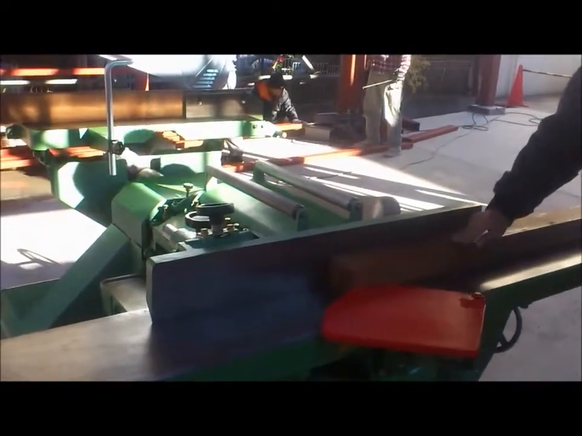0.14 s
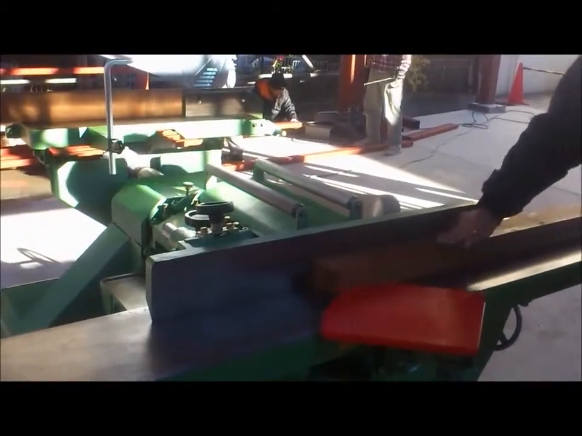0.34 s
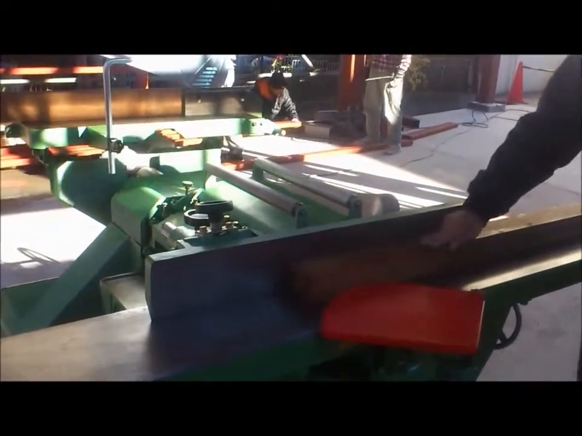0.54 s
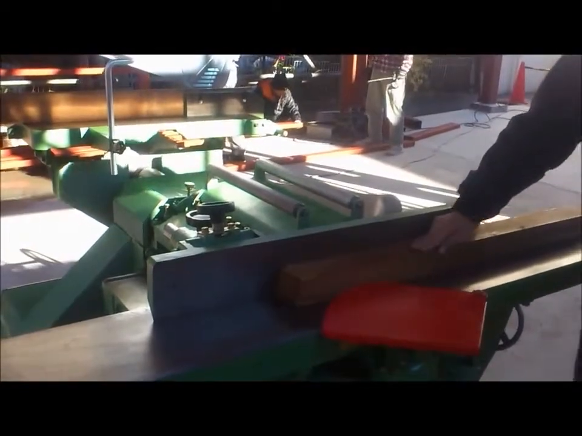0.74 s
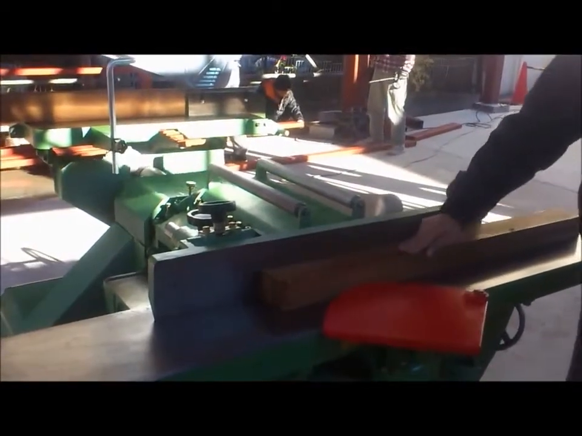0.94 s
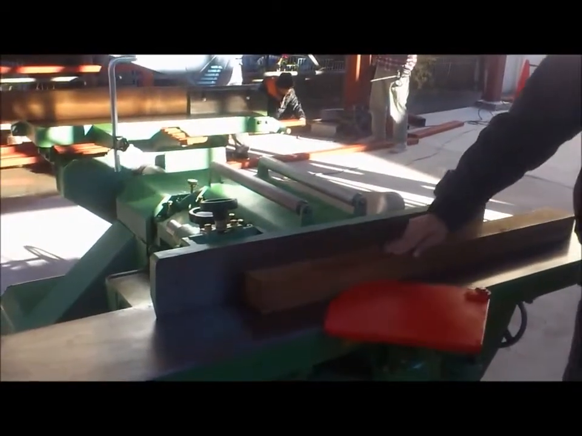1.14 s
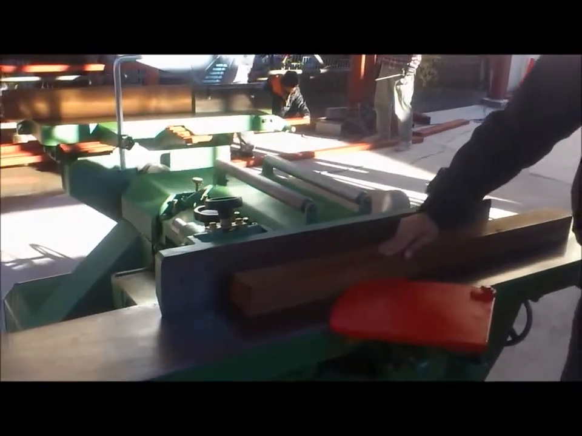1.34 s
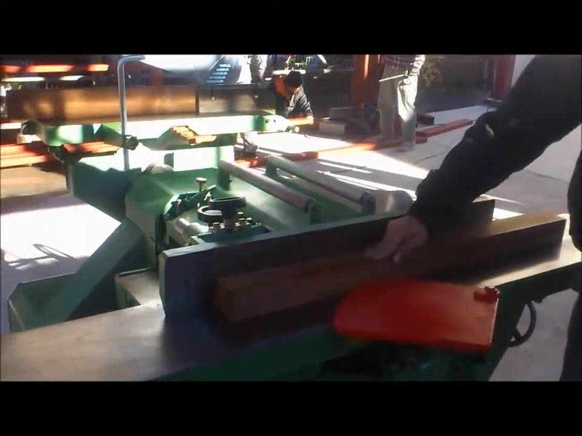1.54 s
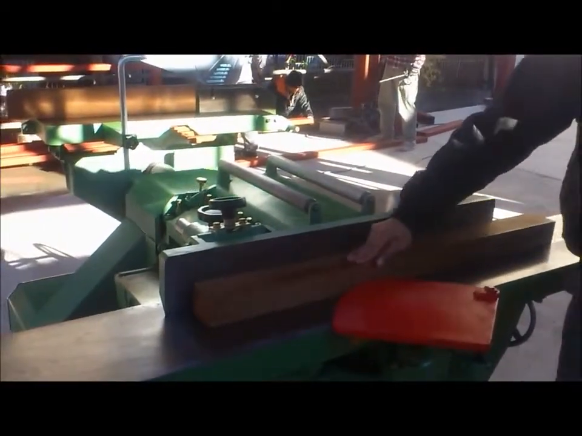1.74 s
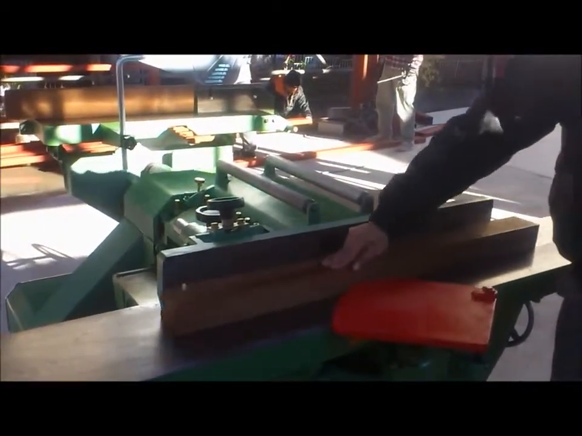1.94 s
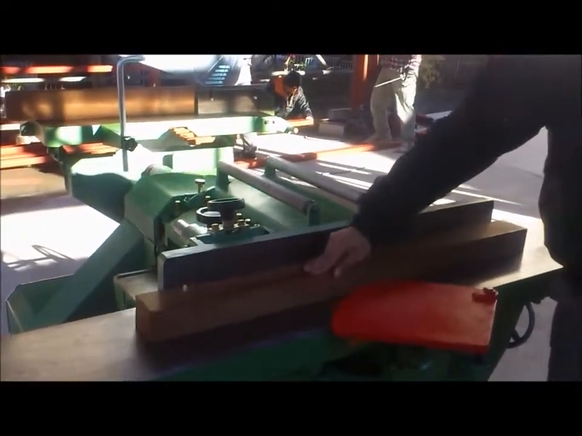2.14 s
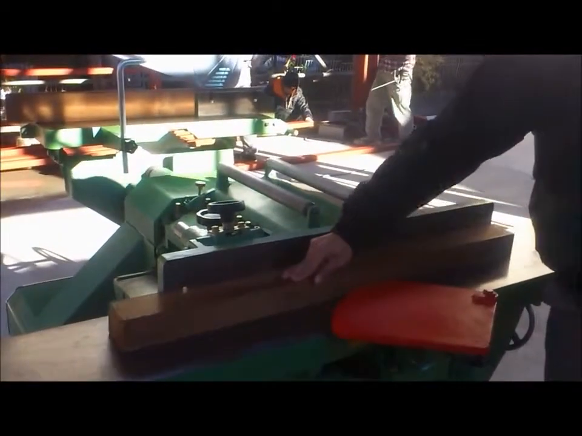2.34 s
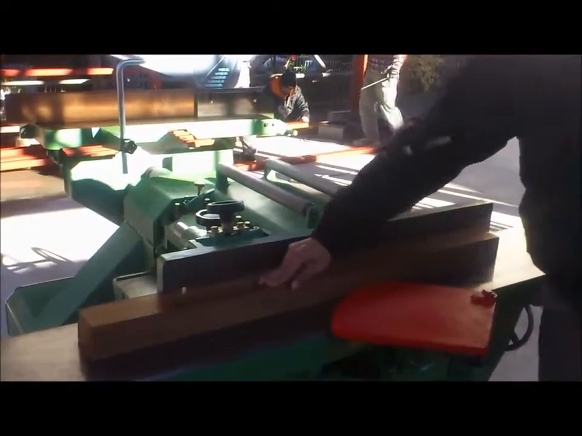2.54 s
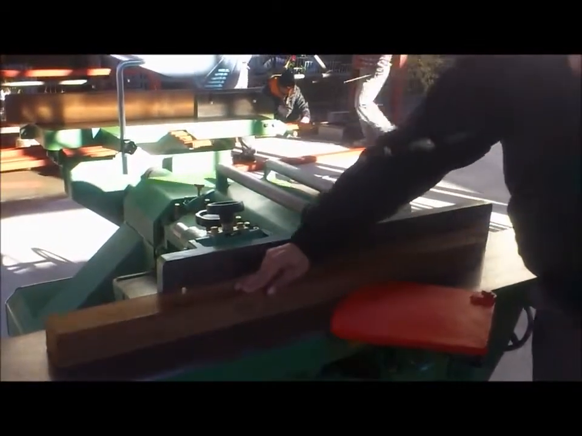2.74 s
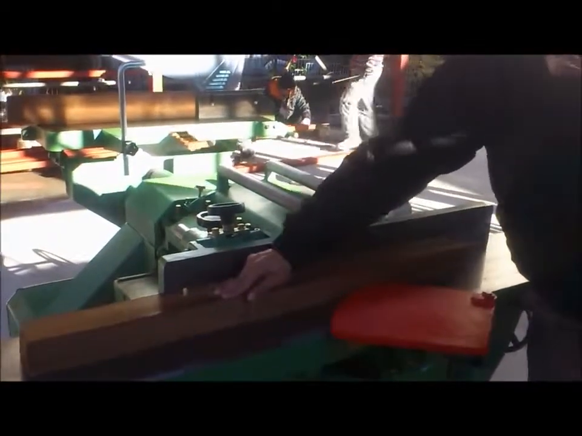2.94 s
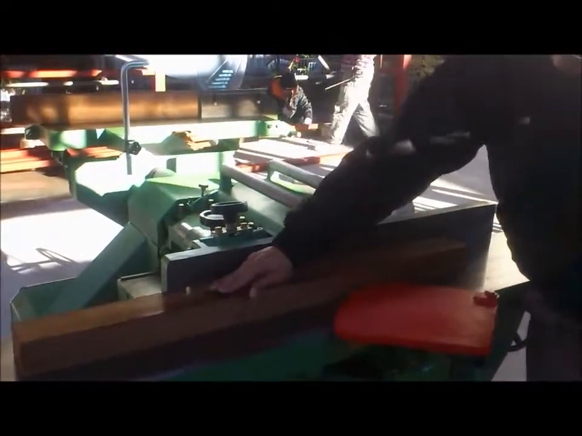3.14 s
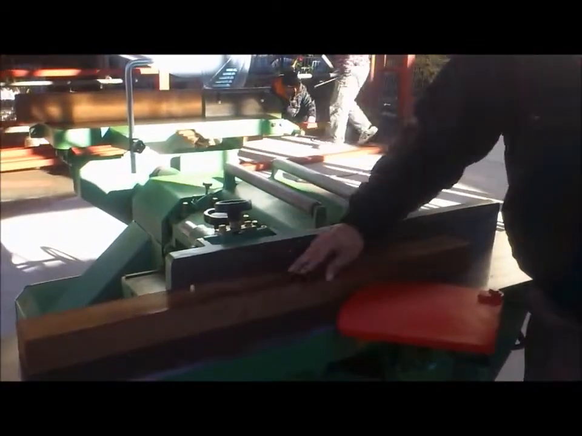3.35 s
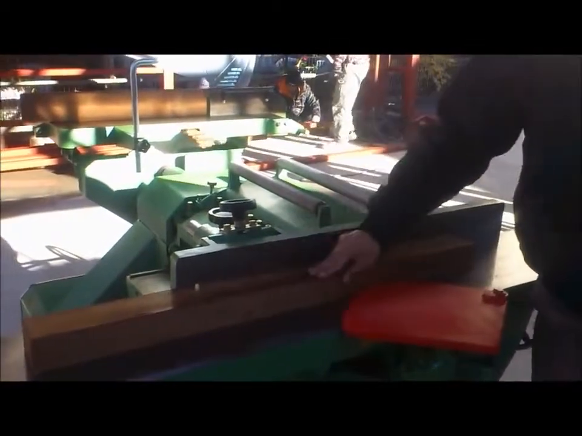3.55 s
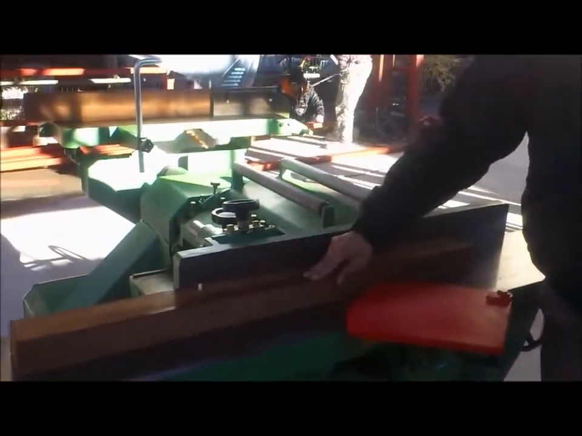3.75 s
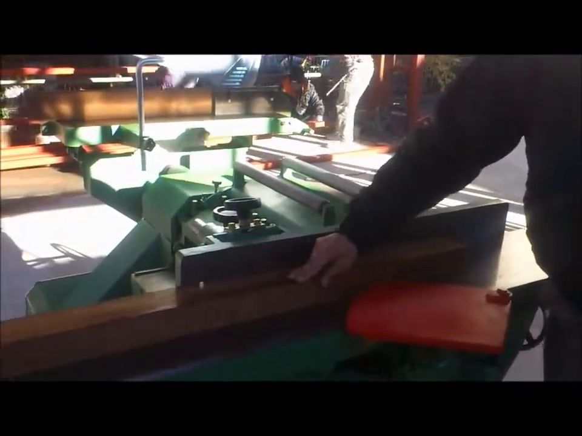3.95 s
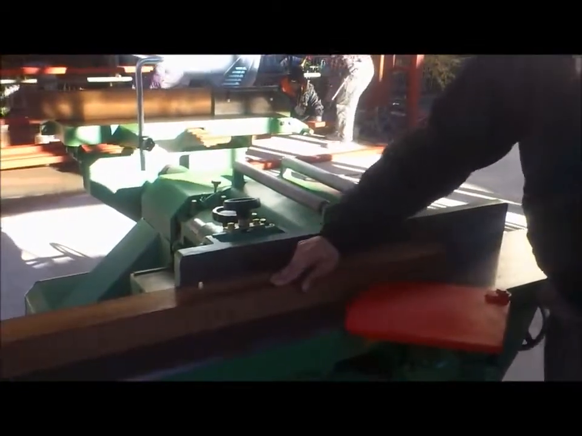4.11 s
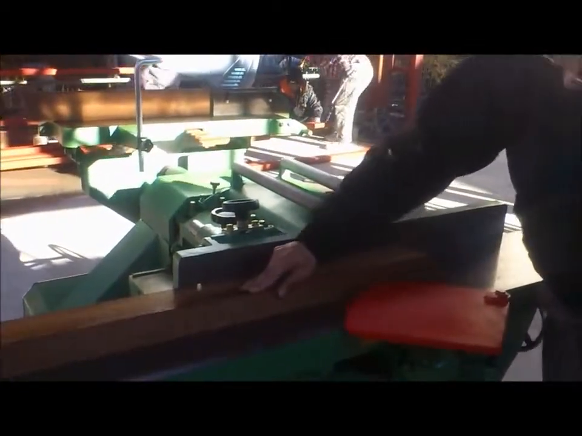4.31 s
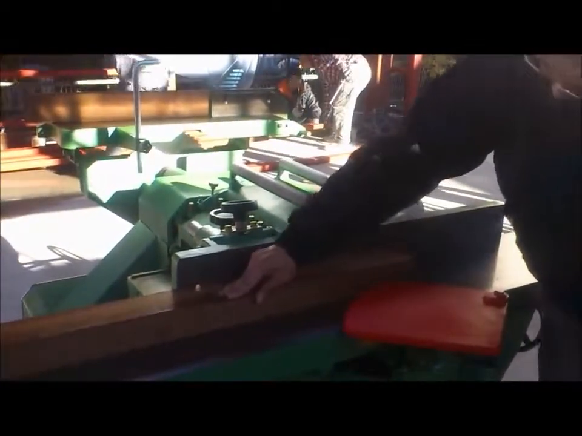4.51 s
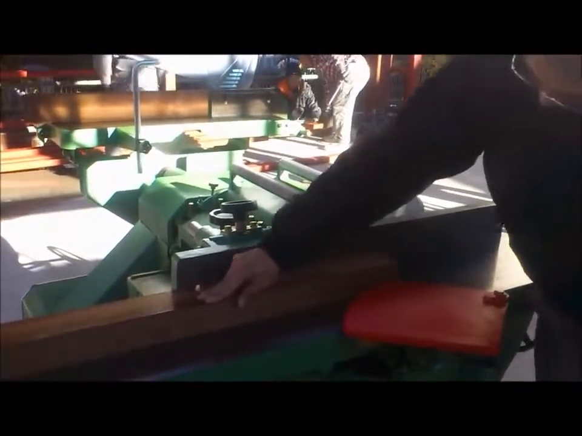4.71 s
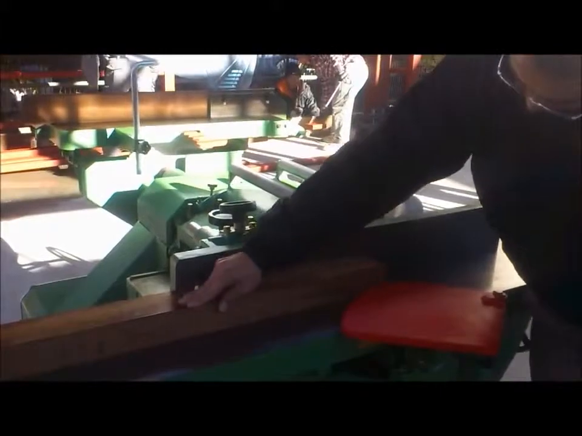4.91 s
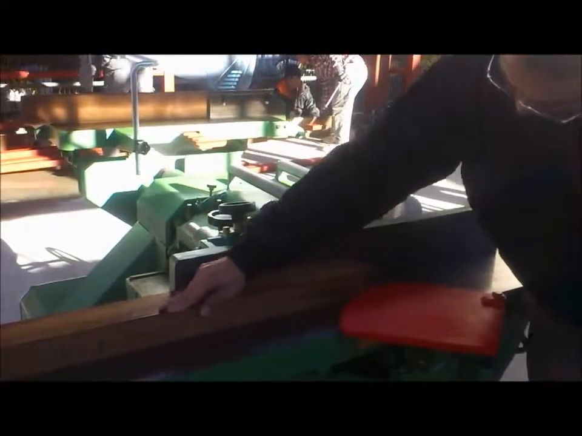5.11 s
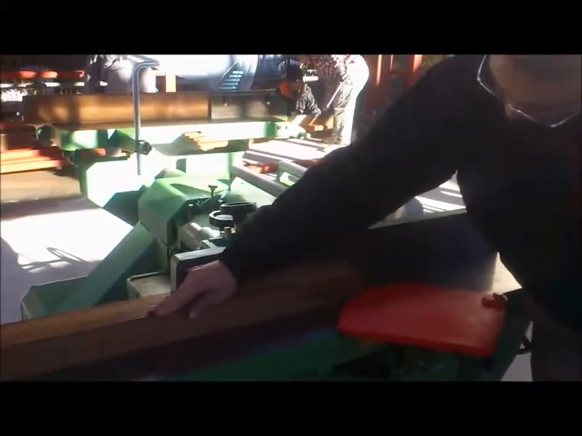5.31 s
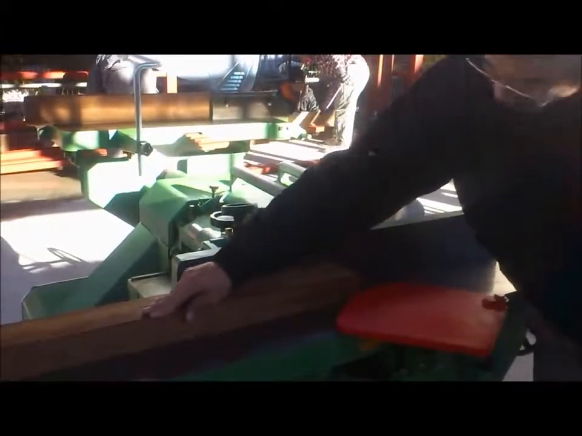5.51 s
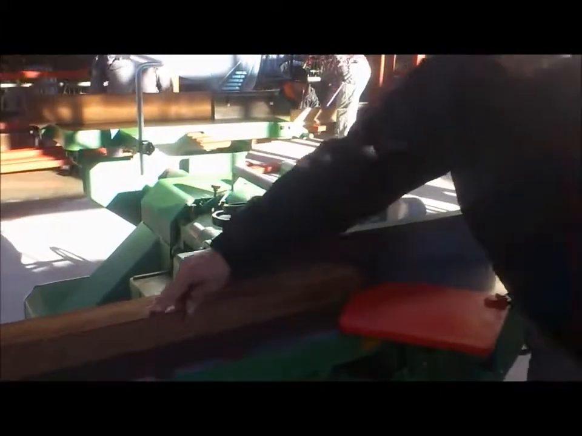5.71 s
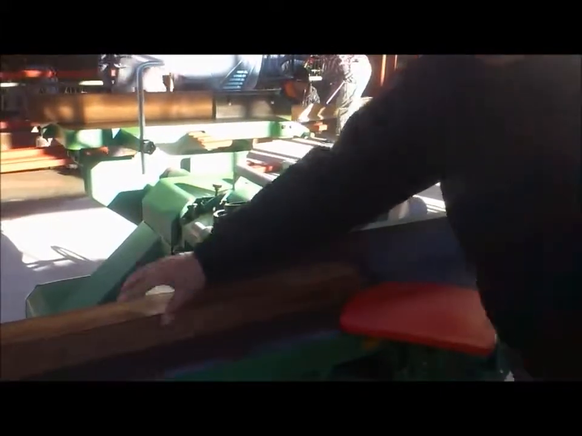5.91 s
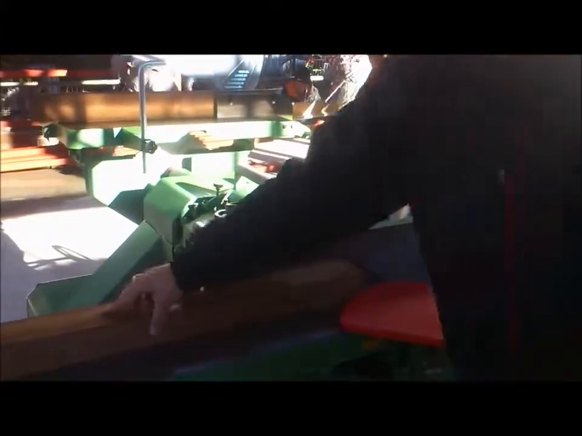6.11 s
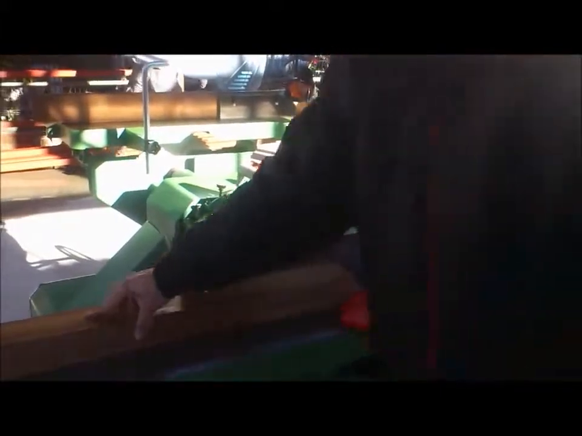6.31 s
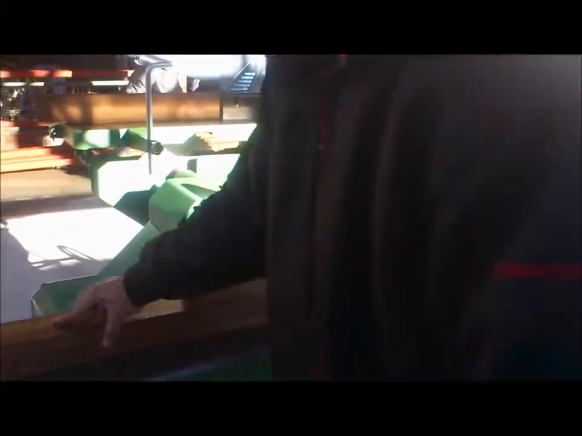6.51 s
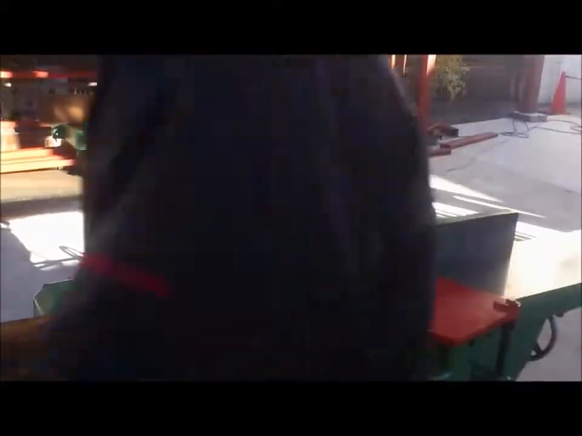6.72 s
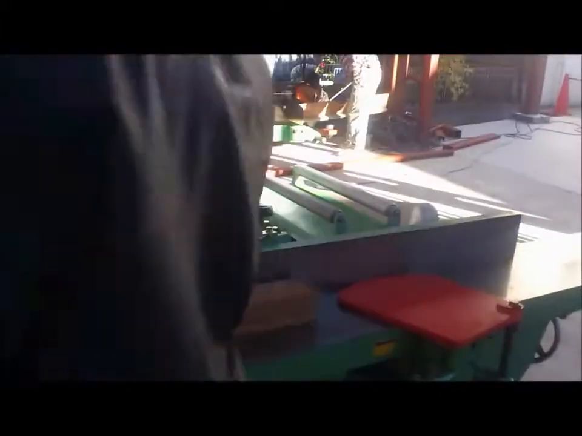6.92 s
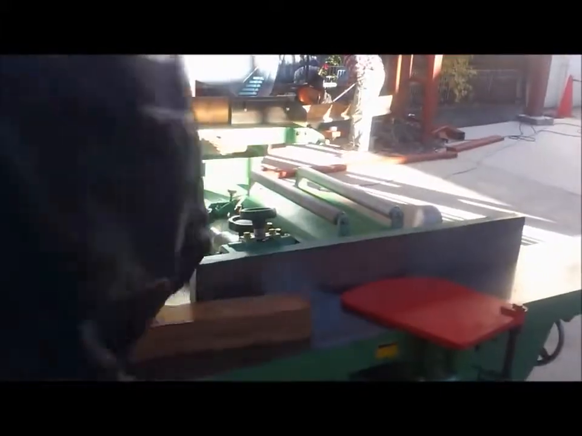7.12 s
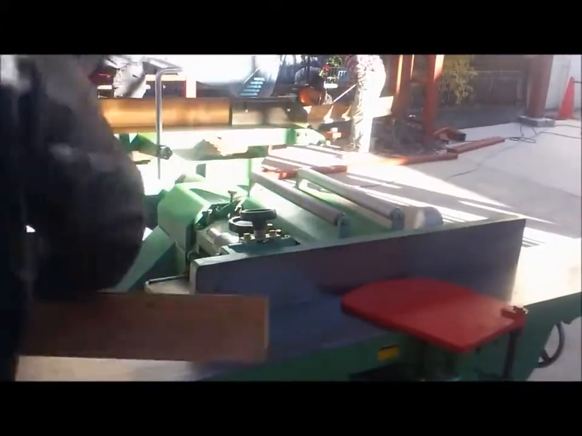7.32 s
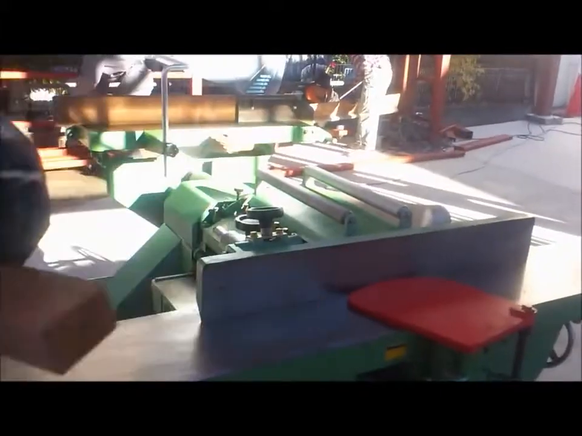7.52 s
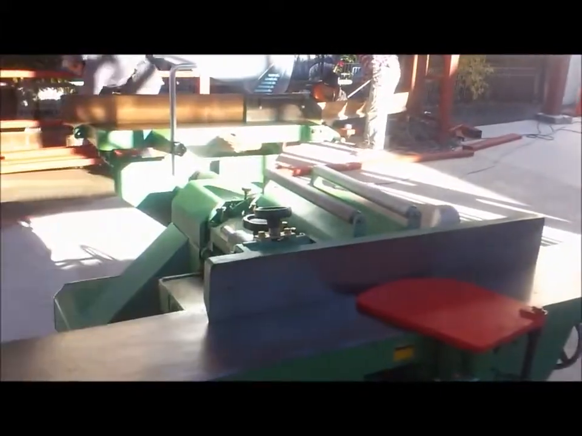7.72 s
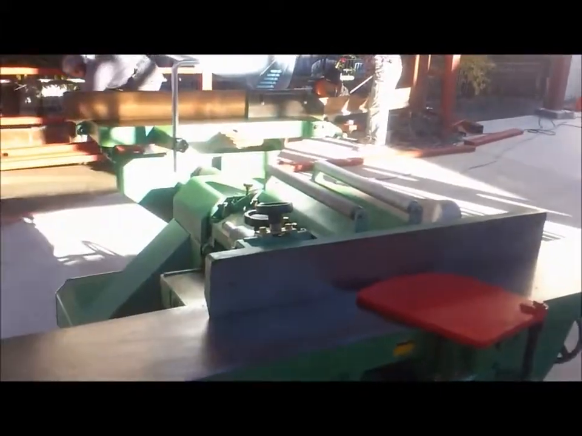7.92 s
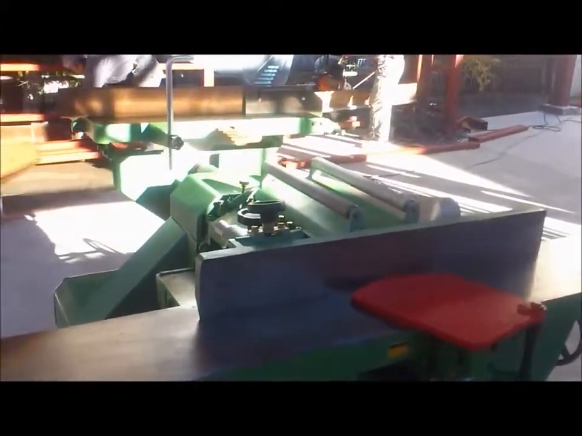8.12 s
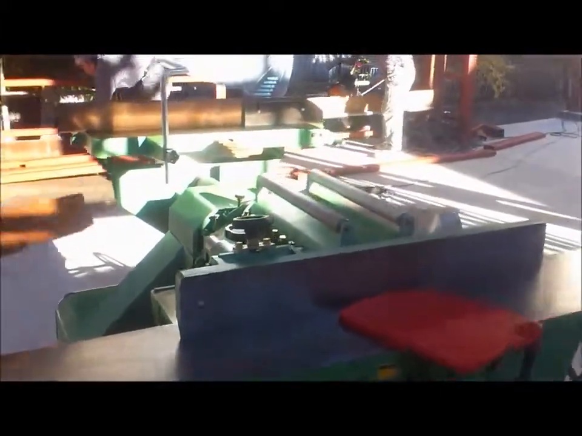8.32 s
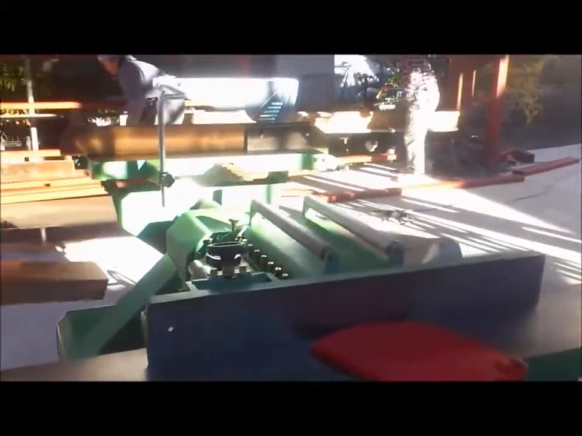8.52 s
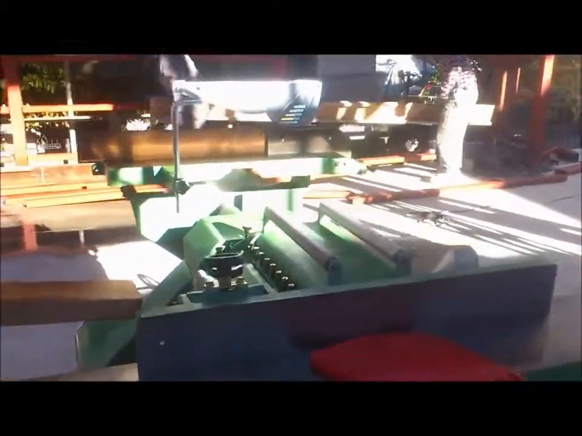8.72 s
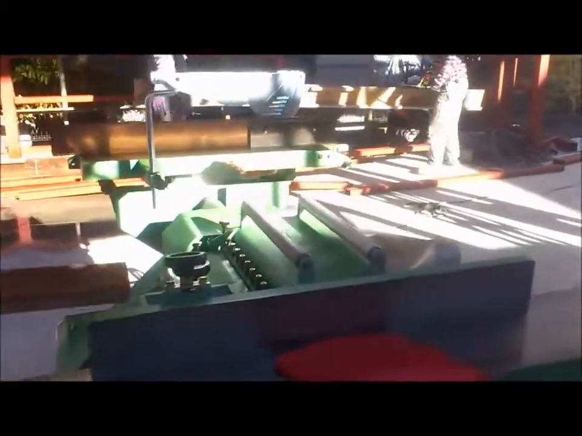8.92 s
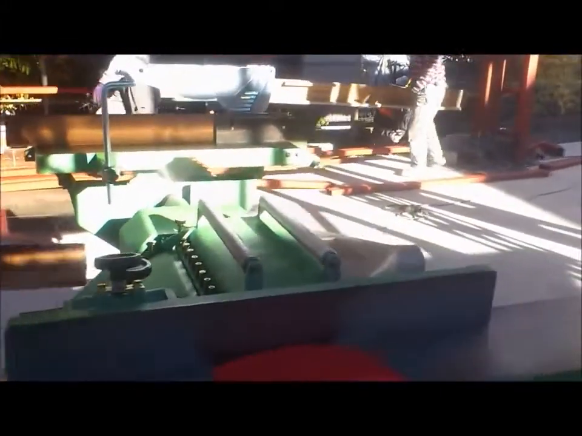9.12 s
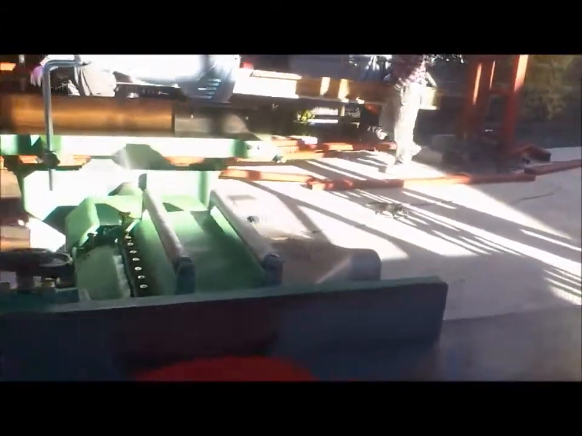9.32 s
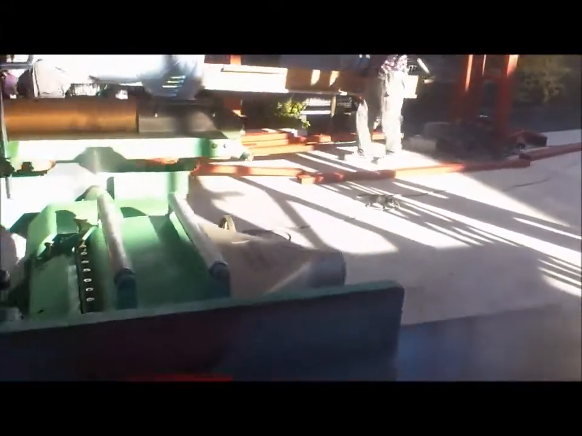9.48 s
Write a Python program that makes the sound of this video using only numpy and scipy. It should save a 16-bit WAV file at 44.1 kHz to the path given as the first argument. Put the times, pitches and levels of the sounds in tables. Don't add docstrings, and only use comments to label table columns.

```python
import sys
import numpy as np
from scipy import signal
from scipy.io import wavfile
from scipy.ndimage import uniform_filter1d, map_coordinates

SR = 44100
rng = np.random.default_rng(int(sys.argv[2]) if len(sys.argv) > 2 else 0)


def master(y):
    cut = np.clip(np.atleast_2d(y).T, -1, 1)
    pcm = np.round(cut * 32767)
    wavfile.write(sys.argv[1], SR, pcm.astype(np.int16))


def voltage_ratio(decibels):
    exponent = np.asarray(decibels, float) / 20
    return 10 ** exponent


N = 421143
TIME_S = np.arange(N) / SR

# f/Hz, density/dB per Hz
WASH_SPECTRUM = [(12, -56), (30, -26), (74, -16.5), (270, -4), (337, -13.5), (388, -7), (434, -17),
                 (513, -6), (825, -11.5), (1400, -12), (1810, -13.5), (2300, -14.5), (2910, -13),
                 (3300, -18), (3840, -19.5), (6500, -23), (9950, -23), (13400, -30.5), (16000, -31.5)]
# t/s, level/dB, treble/dB
WASH_LEVEL = [(0, -34, 2.5), (3.3, -37, 1), (5.1, -37.5, -1), (5.9, -38.5, -1.5), (6.05, -34.5, -1.5),
              (6.2, -38.5, -1), (6.75, -40.5, -2.5), (7, -37, -3), (8, -38, -0.5), (8.6, -37.5, 0.5),
              (9.55, -36.5, 0.6)]
# f/Hz, likeness/1
WASH_LIKENESS = [(30, 0.6), (100, 0.75), (300, 1), (1000, 0.59), (2500, 0.39), (6000, 0.22), (15000, 0.25)]
# f/Hz, level/dB
WASH_LEAN = [(30, 6), (150, -1), (1000, -1), (4000, 3), (6000, 5), (7500, 14), (9000, 20), (11500, 21),
             (13000, 13), (14500, 13), (15700, 6)]
# f/Hz, width/Hz, level/dB, right re left/dB, change once the mic has turned/dB
HUM_BANDS = [(195, 20, -49.5, 3, 2.5), (288, 0.94, -45.5, 4.5, -0.5), (372.5, 10, -50.5, -15, 5),
             (251, 81, -47, -2, 6), (493.2, 79, -45, -7.5, 3), (5183, 6, -64.5, -1, -8),
             (4350, 150, -65, -1, 0), (170, 5, -59, -2, 0), (8940, 750, -52.5, -27, 3),
             (10180, 800, -50, -36, -2), (13000, 300, -57, -23, 0)]
# t/s, level/dB
JOLTS = [(1.28, -59), (2.9, -52), (4.23, -51), (4.95, -51), (7.29, -47), (7.53, -53), (8.01, -52),
         (9.23, -54), (9.39, -53)]
# f/Hz, density/dB per Hz
SCRAPE_SPECTRUM = [(900, -24), (1500, 4), (2600, 0), (3200, 4), (4500, 3), (6500, 0.5), (9300, 6),
                   (12000, -2), (15500, -12)]
# t/s, level/dB, rise/s, fall/s, left minus right/dB
SCRAPES = [
    (5.97, -47, 0.014, 0.065, 19),
    (6.05, -42.5, 0.027, 0.067, 22),
    (6.634, -34, 0.00089, 0.015, 20),
    (6.671, -35, 0.027, 0.057, 16),
    (7.385, -47, .003, 0.047, 20),
    (8.07, -49, .003, 0.043, 25),
]
# t/s, level/dB, f/Hz, t60/s
TICKS = [
    (6.635, -16, 9400, .012),
    (6.635, -32, 1900, .02),
    (6.664, -24, 4200, .012),
    (6.673, -24, 4100, .015),
]
# f/Hz, level/dB, t60/s
GUARD_MODES = [(703, 19, 0.072), (820, 28, 0.03), (1060, 8, 0.05), (1360, 26, 0.11), (1403, 12, 0.32),
               (1980, 3, 0.07), (2375, 19, 0.061), (2650, 20, 0.1), (2890, 6, 0.04), (3500, 8, .07),
               (3760, 5, 0.078), (4560, 3, 0.089), (5100, 6, 0.05), (7100, 7, 0.066)]
# t after knock/s, level/dB
GUARD_BOUNCES = [
    (0, 0),
    (.0085, -7),
    (.026, -16),
    (.043, -20),
]
# t/s, f/Hz
KNIFE_RATE = [(0, 128.43), (.6, 128.27), (1.4, 128.19), (2.2, 128.15), (3.1, 128.18), (3.65, 128.37),
              (4.2, 128.24), (4.7, 128.2), (5.05, 128.25), (5.4, 128.36), (6.2, 128.43), (6.8, 128.39),
              (7.4, 128.45), (8.6, 128.53), (9.55, 128.56)]
# multiple/1, level/dB
COVERED_LINES = [(1, -26.5), (2, -25.5), (3, -7), (4, -1.5), (5, -13.5), (6, -33), (7, -3), (8, -9),
                 (9, -20.5), (10, -36.5), (11, -53), (12, -26), (13, -2.5), (14, -0.5), (15, -66),
                 (16, -21), (17, -10), (18, -9.5), (19, -10), (20, -21), (21, -9), (22, 27), (23, -1),
                 (24, 0.5)]
LIFTED_LINES = [(1, -12), (2, 1.5), (3, -6.5), (4, -5.5), (5, -9.5), (6, -30), (7, -26.5), (8, -12),
                (9, -7), (10, -17.5), (11, -3), (12, -5.5), (13, -14), (14, -27), (15, -2), (16, -2.5),
                (17, -14.5), (18, -10), (19, -23), (20, -13.5), (21, -39), (22, -31), (23, -34),
                (24, -12.5)]
OPEN_LINES = [(1, -11), (2, -10), (3, -7.5), (4, -6), (5, -10), (6, -0.5), (7, 3.5), (8, 4.5), (9, -12.5),
              (10, 4.5), (11, -6.5), (12, -13), (13, -8.5), (14, -30), (15, -4), (16, 3), (17, 3.5),
              (18, -4), (19, -32), (20, -42), (21, -21), (22, -13), (23, 5.5), (24, -43)]
# t/s, level/dB, board position/1 (0 covered, 1 lifted, 2 open)
WHINE_LEVEL = [(0, -42, 0.92), (.12, -19, 0.54), (1.5, -21.5, 0.62), (2.5, -26.5, 0.54),
               (3.15, -22.5, 0.65), (3.4, -25, 0.64), (3.9, -23.5, 0.67), (4.85, -22.5, 0.65),
               (4.93, -34, 0.45), (5.03, -26.5, 0.71), (5.1, -39, 0.97), (5.8, -35.5, 0.89),
               (6.7, -44, 1.27), (7, -44, 1.81), (7.6, -42, 1.76), (8.2, -41.5, 1.83), (8.7, -45.5, 2.26),
               (9.55, -41.5, 2)]
FACING_SHIFT_DB = [-5.5, 3, 3.2, 0.2, 4.3, -7, -6, -8, 10.5, -10.5, 4, 8, 2, 4, -1, -2, -2.5, -2, 4, 2.1,
                   .1, -.6, -15, .1]
CLEAR_SHIFT_DB = [5, 4, 2, 5, 5, 22, 2, 6, -1, -1, 7, -4, -2, 3, 13, 8, -16, -6, -5, -12, 2.1, 7, 8, 4]
# t/s, length/s, level/dB, extra lag/rad, left minus right/dB
SINGS = [
    (0.403, 0.7, 14.5, 0.2, 10),
    (2.8, 0.33, 11, -0.5, -4),
    (3.95, 0.22, 10, -0.5, -3),
    (4.402, 0.2, 14, 5, -10),
    (4.8, 0.3, 14, 1, -3),
]
# t/s, bite/dB
PASSES = [
    [(0.14, -30.5), (0.15, -32), (1.28, -20), (1.51, -22), (1.71, -18), (1.89, -22.5), (2.01, -18.5),
     (2.98, -16.5), (3.2, -24)],
    [(3.69, -37), (3.848, -22.5), (4.068, -22), (4.19, -17.5), (4.886, -20), (4.908, -16.5), (4.988, -19),
     (5.022, -27.5), (5.05, -27)],
]
# landing/s, lift-off/s, tail breakout/dB
TOUCH = [
    (.12, .11, 1),
    (.035, .011, 7),
]
# f/Hz, density/dB per Hz
BITE_LEFT = [(1200, -16), (2000, -16), (3000, -12), (4000, -10), (5000, -12), (6300, -10), (7600, -9),
             (8600, -5), (9500, -1), (10500, -4), (11500, -10), (12800, -13), (14200, -15), (15700, -16)]
BITE_RIGHT = [(1200, -9.5), (2000, -7.5), (3000, -5), (4000, -4), (5000, -4), (6300, -4), (7600, -4.5),
              (8600, -5), (9500, -10), (10500, -9.5), (11500, -9), (12800, -11), (14200, -10), (15700, -10)]
# t/s, share/1
ONE_SPOT = [(0, .3), (1, .35), (1.8, .5), (2.7, .45), (2.95, .25), (3.7, .85), (4.12, .85), (4.25, .25),
            (5.1, .35)]
# t/s, delay/ms
ECHO_DELAY = [(0, .95), (2, 1.02), (3.25, .84), (3.7, 1.05), (5.1, .86), (9.55, .86)]


def evened(x):
    return x / np.sqrt(np.mean(x ** 2) + 1e-20)


def read(points, hz):
    f, value = np.transpose(points)
    return np.interp(np.log(hz + 1), np.log(f + 1), value)


def curves(rows):
    s, *columns = np.transpose(rows)
    return [np.interp(TIME_S, s, c) for c in columns]


def colour(x, left, right):
    hz = abs(np.fft.fftfreq(4096, 1 / SR))
    log = np.log(voltage_ratio([read(left, hz), read(right, hz)]) + 1e-5)
    taps = np.fft.ifft(np.exp(log - 1j * signal.hilbert(log).imag)).real[:, :1024]
    return signal.oaconvolve(x, taps, axes=1)[:, :x.shape[1]]


def band(x, lo_hz, hi_hz):
    sos = signal.butter(2, [lo_hz, min(hi_hz, 21000)], "bandpass", fs=SR, output="sos")
    return signal.sosfilt(sos, x)


def steep_noise(shape, lo_hz, hi_hz):
    return evened(band(band(rng.standard_normal(shape), lo_hz, hi_hz), lo_hz, hi_hz))


def drift(count, seconds):
    steps = N // 512 + 2
    slow = rng.standard_normal((count, steps))
    slow = uniform_filter1d(slow, max(round(seconds * SR / 512), 1), axis=1)
    return [np.interp(np.arange(N) / 512, np.arange(steps), evened(row)) for row in slow]


def knives():
    return np.cumsum(curves(KNIFE_RATE)[0]) / SR + .62


def wash():
    lag_s, patchy_db, throb = .00008, 1.46, .061
    frames, hz = N // 256 + 5, np.fft.rfftfreq(1024, 1 / SR)
    a, b, c, d, patches = rng.standard_normal((frames, 513, 5)).T
    patches = evened(uniform_filter1d(uniform_filter1d(patches, 12, 0), 14, 1))
    same = np.clip(read(WASH_LIKENESS, hz), -1, 1)[:, None]
    left, other = a + 1j * b, c + 1j * d
    late = left * np.exp(-2j * np.pi * hz * lag_s)[:, None]
    z = np.array([left, same * late + np.sqrt(1 - same ** 2) * other])
    lean_db = read(WASH_LEAN, hz) / 2
    left_db = np.minimum(lean_db, 3)
    side_db = read(WASH_SPECTRUM, hz) + [left_db, left_db - 2 * lean_db]
    z *= voltage_ratio(side_db[:, :, None] + patchy_db * patches)
    air = evened(signal.istft(z, nperseg=1024, noverlap=768)[1][:, :N])
    level_db, treble_db = curves(WASH_LEVEL)
    treble = band(air, 1600, 24000) * (voltage_ratio(treble_db) - 1)
    return voltage_ratio(level_db) * (air + treble) * (1 + throb * np.cos(2 * np.pi * knives()))


def hum():
    out = np.zeros((2, N))
    turned = np.clip((TIME_S - 7.8) / 1.1, 0, 1)
    turn_throb = .7 * np.cos(np.pi * knives())
    shaded_db = -14 * (TIME_S < 5.5)
    for hz, width_hz, db, right_db, turned_db in HUM_BANDS:
        r = np.exp(-np.pi * width_hz / SR)
        a, b = signal.lfilter([1], [1, -2 * r, r * r], rng.standard_normal((2, N)))
        angle = 2 * np.pi * hz * TIME_S
        tone = evened((.62 + evened(a)) * np.cos(angle) + evened(b) * np.sin(angle))
        whistle = hz > 8000
        gain = voltage_ratio(turned_db * turned + whistle * shaded_db) * (1 + whistle * turn_throb)
        out += voltage_ratio([[db], [db + right_db]]) * tone * gain
    return out * voltage_ratio(.16 * (curves(WASH_LEVEL)[0] + 25))


def jolts():
    out = np.zeros((2, N))
    for s, db in JOLTS:
        u = TIME_S - s
        out += voltage_ratio([[db + 7], [db - 15]]) * np.exp(-(u / .026) ** 2) * np.cos(2 * np.pi * 38.2 * u)
    return out


def scrapes():
    out, u = np.zeros((2, N)), np.arange(SR // 2) / SR
    rub = rng.standard_normal((3, N))
    rub = evened(colour(rub[0] + 2 * rub[1:], SCRAPE_SPECTRUM, SCRAPE_SPECTRUM))
    for s, db, rise_s, fall_s, pan_db in SCRAPES:
        rise = np.exp(-((TIME_S - s) / rise_s) ** 2)
        fall = voltage_ratio(-30 * np.maximum(TIME_S - s, 0) / fall_s)
        out += rub * np.where(TIME_S < s, rise, fall) * voltage_ratio(db + np.array([[pan_db], [-pan_db]]) / 2)
    for s, db, hz, t60_s in TICKS:
        noise = evened(band(rng.standard_normal(len(u)), .9 * hz, 1.1 * hz))
        tick = voltage_ratio(db - 60 * u / t60_s) * np.minimum(u / .001, 1) * noise
        out[:, round(s * SR):][:, :len(u)] += tick * voltage_ratio([[0], [-8]])
    return out


def guard_knock():
    knock_s, knock_db, crack_db, ring_db = 6.849, -12, -12, -17
    out, u = np.zeros((2, N)), np.arange(SR // 2) / SR
    modes = sum(voltage_ratio(db - 60 * u / t60_s) * np.sin(2 * np.pi * hz * u) for hz, db, t60_s in GUARD_MODES)
    modes = sum(voltage_ratio(db) * np.roll(modes, round(s * SR)) * (u >= s) for s, db in GUARD_BOUNCES)
    rattle = steep_noise((2, len(u)), 490, 3200)
    knock = modes / abs(modes).max() + rattle * (voltage_ratio(crack_db - 60 * u / .09) + voltage_ratio(ring_db - 60 * u / .35))
    bright = evened(band(rng.standard_normal((2, len(u))), 3000, 7200))
    knock += bright * voltage_ratio(-21.5 - 60 * u / .16)
    at = round(knock_s * SR)
    out[:, at:at + len(u)] += voltage_ratio(knock_db) * band(knock, 350, 16000)
    return out


def landing():
    thump_s, thump_db, rise_s, t60_s = .159, -30.5, .043, .27
    gust_db, gust_s = -53.5, 1.1
    u = TIME_S - thump_s
    shape = np.where(u < 0, np.exp(-(u / rise_s) ** 2), voltage_ratio(-60 * u / t60_s))
    thump = voltage_ratio(thump_db) * shape * steep_noise(N, 130, 905)
    return thump + voltage_ratio(gust_db) * np.exp(-(TIME_S / gust_s) ** 4) * steep_noise(N, 65.6, 102)


def pressure(rows, landing_s, lift_s):
    since, until = TIME_S - rows[0][0], rows[-1][0] - TIME_S
    off = np.minimum(since, 0) / landing_s + np.minimum(until, 0) / lift_s
    return curves(rows)[0] + np.maximum(-48 * off ** 2, -120), since, until


def feeds():
    return [pressure(rows, landing_s, lift_s) for rows, (landing_s, lift_s, _) in zip(PASSES, TOUCH)]


def whine():
    waver_db, waver_rad, scatter_rad = .8, .3, .59
    sweep_rad = .07
    facing_s, facing_db = 7.8, 8
    level_db, position = curves(WHINE_LEVEL)
    off = np.clip(position, .4, .9) * 2 - .8
    turned = np.maximum(TIME_S - facing_s, 0) / (N / SR - facing_s)
    bite_db = np.max([feed[0] for feed in feeds()], 0)
    clear = (1 - off) * np.clip((-35 - bite_db) / 25, 0, 1)
    low_db = -39 - off + facing_db * turned - level_db
    high_db = -6.5 - 4.5 * off - 10 * clear
    middle_db = -11 * np.exp(-TIME_S / .89)
    sings = (np.outer(size, np.exp(-((TIME_S - s) / length_s) ** 2)) for s, length_s, *size in SINGS)
    sing_db, sing_rad, sing_pan_db = sum(sings)
    masked_db = -5 * (1 - off) / (1 + np.exp((1.8 - TIME_S) / .25))
    shaken = 1 + .4 * (1 - off)
    turns, hz = knives(), curves(KNIFE_RATE)[0]
    lag_s = np.interp(position, range(3), (.00017, .0001, .00007))
    slow, out = drift(count=3 * len(OPEN_LINES), seconds=.2), np.zeros((2, N))
    for (k, a), (_, b), (_, c) in zip(COVERED_LINES, LIFTED_LINES, OPEN_LINES):
        line = int(k) - 1
        level_wave, angle_wave, lag_wave = slow[3 * line:3 * line + 3]
        db = a + (b - a) * np.clip(position, 0, 1) + (c - b) * np.clip(position - 1, 0, 1)
        db += (k < 6) * low_db + (k > 14) * high_db + waver_db * shaken * level_wave
        db += (11 < k < 15 or k in (18, 19, 22, 23, 24)) * middle_db + (k == 20) * sing_db
        db += FACING_SHIFT_DB[line] * turned + CLEAR_SHIFT_DB[line] * clear
        angle = 2 * np.pi * k * turns - sweep_rad * (k - 6) ** 2
        angle += scatter_rad * rng.standard_normal() + waver_rad * angle_wave
        lag = 2 * np.pi * k * hz * lag_s * np.clip((k - 7) / 12, .15, .9) * (1 + .2 * lag_wave)
        lag += (k == 20) * sing_rad
        pan_db = (k == 20) * sing_pan_db + (6 < k < 15) * masked_db
        out += voltage_ratio([db + pan_db / 2, db - pan_db / 2]) * np.sin([angle, angle - lag])
    return voltage_ratio(level_db) * out * voltage_ratio([[-.9], [.9]])


def grain(passes):
    width, fine, memory_turns = 688, 3, 13
    twin, echo, repeat, shared = .45, .15, .8, .056
    kept = rng.standard_normal((2, int(passes[-1] / 2) + 2, width))
    kept = uniform_filter1d(uniform_filter1d(kept, memory_turns, 1), memory_turns, 1)
    kept = kept + twin * np.roll(kept, width // 2, 2)
    kept = kept + echo * np.roll(kept, width // 4, 2)
    at = np.round(passes / 2 * width * fine).astype(int)
    kept = signal.resample_poly(kept.reshape(2, -1), fine, 1, axis=1)[:, at]
    left, other = np.sqrt(repeat) * evened(kept) + np.sqrt(1 - repeat) * rng.standard_normal((2, N))
    late = np.roll(left, 5)
    high, low = (np.sqrt(s) * late + np.sqrt(1 - s) * other for s in (shared, curves(ONE_SPOT)[0]))
    middle = .45 * left + .89 * other
    under_low, under_high = (signal.firwin(129, hz, fs=SR) for hz in (4500, 7000))
    right = high + signal.oaconvolve(middle - high, under_high, "same")
    return np.array([left, right + signal.oaconvolve(low - middle, under_low, "same")])


def board_echo(x):
    share, far_path = .24, 1.63
    at, delay = np.arange(N), curves(ECHO_DELAY)[0] * SR / 1000
    near, far = (map_coordinates(x[0], [at - delay * path], order=3, prefilter=False)
                 for path in (1, far_path))
    a, b = drift(count=2, seconds=.25)
    return np.array([x[0] + share * ((1 + a) * far - (1 + b) * near), x[1]])


def grip(passes, full_bite_db):
    seated = 1 / (1 + np.exp((1.9 - TIME_S) / .25))
    edge = sum(np.exp(-abs(x) / .12) for _, since, until in passes for x in (since, until))
    bite_db = np.max([p[0] for p in passes], 0)
    entry_db = 5.5 + 2.5 * seated + 9 * edge
    exit_db = 5 - 5 * seated - 8 * edge
    return entry_db, exit_db, np.clip(.6 * (bite_db - full_bite_db), -8, 0)


def cut():
    rest_db, uneven_db, right_db, full_bite_db = -7, 1.5, -9, -14.5
    board, alike, loose_share = .44, .044, .35
    snap, leave, tear = .17, .52, .66
    passes, bites = knives(), feeds()
    entry_db, exit_db, second_db = grip(bites, full_bite_db)
    u = passes % 1
    power = voltage_ratio(2 * entry_db) * np.exp(-2 * u / snap)
    power += voltage_ratio(2 * exit_db) * np.exp(-2 * ((u - leave) % 1) / snap)
    power += 1 / (1 + np.exp((u - tear) / .2))
    uneven = uneven_db * rng.standard_normal(int(passes[-1]) + 1)[passes.astype(int)]
    knife_db = second_db * (passes % 2 > 1) + uneven
    power = uniform_filter1d(power * voltage_ratio(2 * knife_db) + voltage_ratio(2 * rest_db), 7)

    sides = voltage_ratio([[0], [right_db]])
    fibres = colour(evened(board_echo(grain(passes))), BITE_LEFT, BITE_RIGHT) * sides
    chips = band(fibres * power ** .5, 4500, 16500)
    chips[1] *= voltage_ratio(-3.5 * np.exp(-(TIME_S / 1.5) ** 4))
    torn = rng.standard_normal(N)
    loose = np.array([torn, np.roll(torn, 2)]) + loose_share * rng.standard_normal((2, N))
    loose = colour(loose, BITE_LEFT, BITE_RIGHT) * sides
    crunch = band((fibres + loose_share * loose) * power ** (board / 2), 1090, 6710)
    crunch += alike * band(crunch[::-1], 4700, 5700)
    chips, crunch = (x / np.sqrt(uniform_filter1d(x.mean(0) ** 2, 4000)) for x in (chips, crunch))

    out = np.zeros((2, N))
    fall_db = TIME_S * 280
    for (bite_db, _, until), (*_, breakout_db) in zip(bites, TOUCH):
        crunch_db = bite_db - 6.5 - .15 * np.maximum(bite_db - full_bite_db, -40)
        crunch_db += breakout_db * np.exp(-(until / .22) ** 4)
        yard_db = np.maximum.accumulate(crunch_db + fall_db) - fall_db - 7
        out += voltage_ratio(bite_db) * chips + voltage_ratio(np.maximum(crunch_db, yard_db)) * crunch
    return out


def scene():
    return wash() + hum() + jolts() + scrapes() + guard_knock() + landing() + whine() + cut()


def top_cut(x):
    return signal.sosfilt(signal.butter(12, 16800, fs=SR, output="sos"), x)


def record(dry):
    over = np.maximum(abs(dry) - .42, 0)
    soft = dry - np.sign(dry) * (over - .3 * np.tanh(over / .3))
    low_pass = signal.firwin(511, 15850, window=("kaiser", 9), fs=SR)
    limited = signal.oaconvolve(soft, low_pass[None], "same")
    return top_cut(limited)


dry = scene()
out = record(dry)
master(out)
```